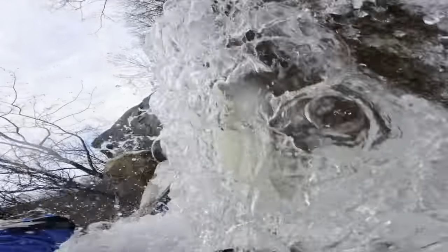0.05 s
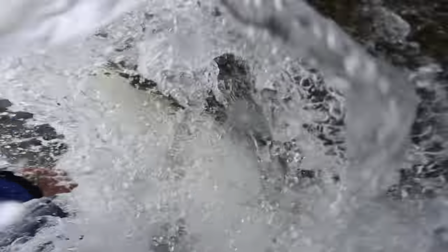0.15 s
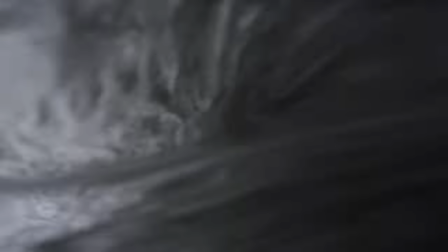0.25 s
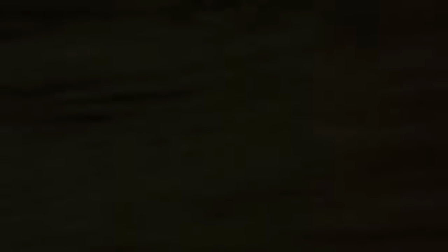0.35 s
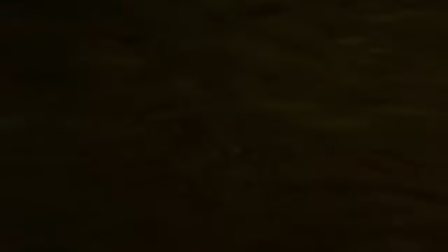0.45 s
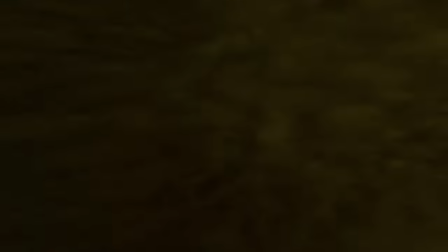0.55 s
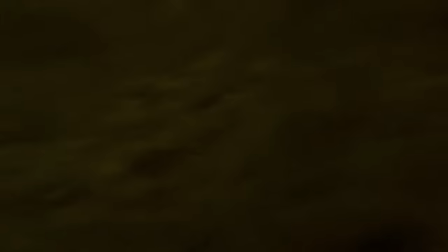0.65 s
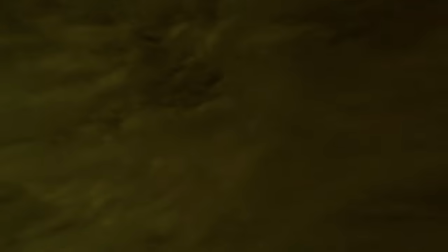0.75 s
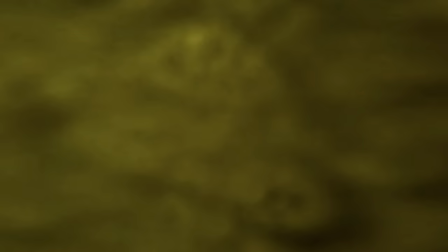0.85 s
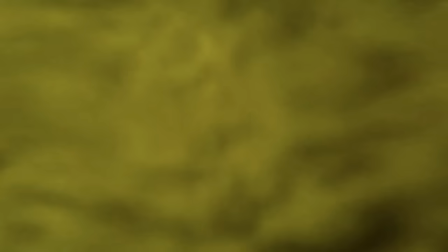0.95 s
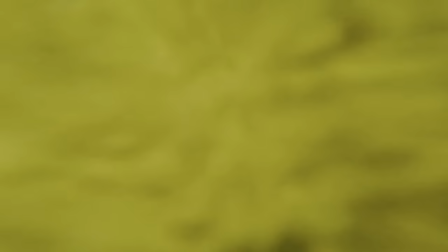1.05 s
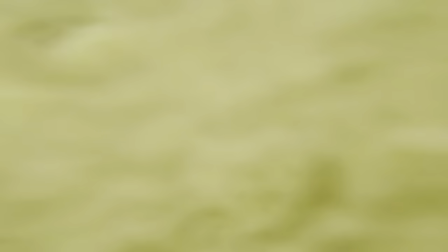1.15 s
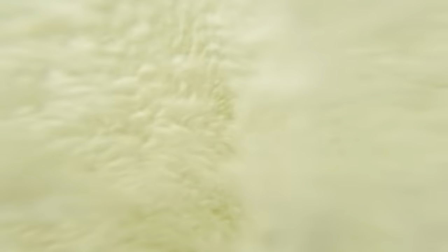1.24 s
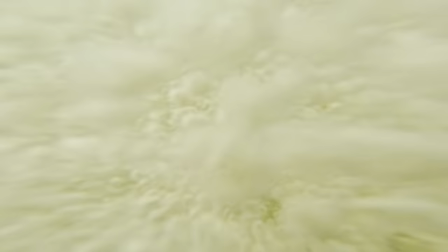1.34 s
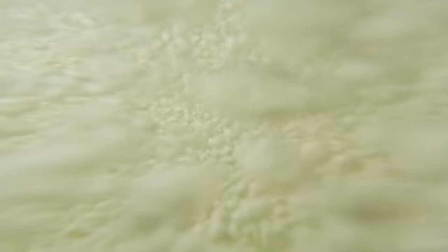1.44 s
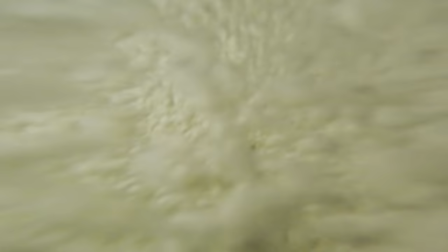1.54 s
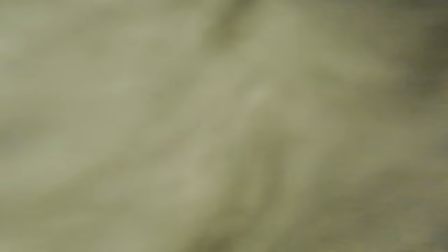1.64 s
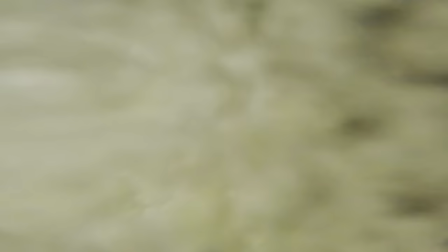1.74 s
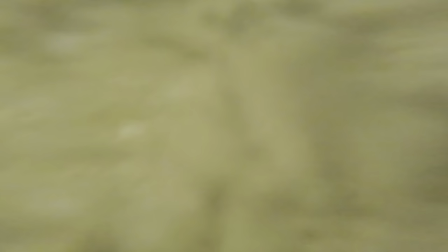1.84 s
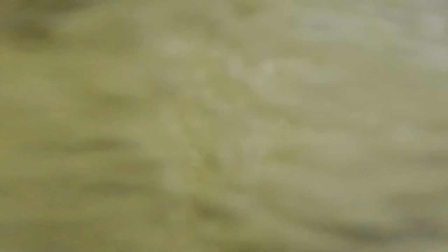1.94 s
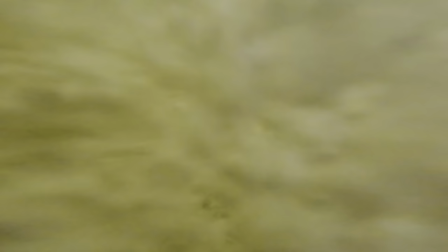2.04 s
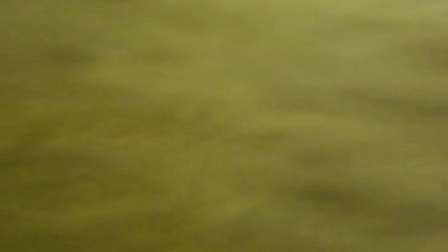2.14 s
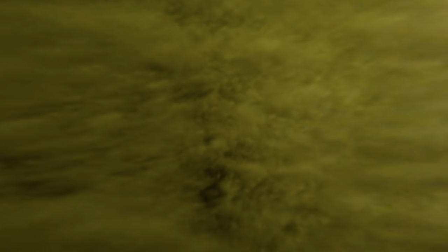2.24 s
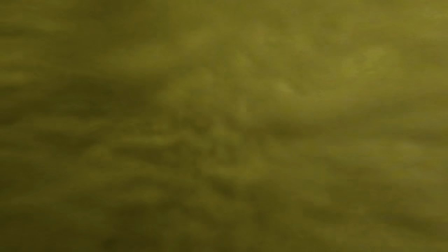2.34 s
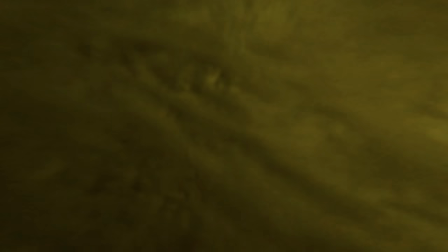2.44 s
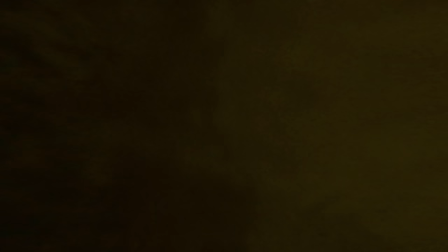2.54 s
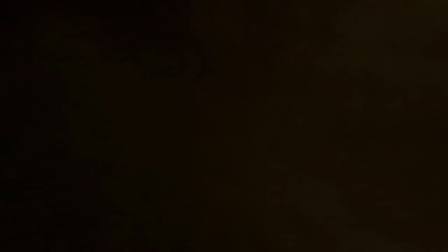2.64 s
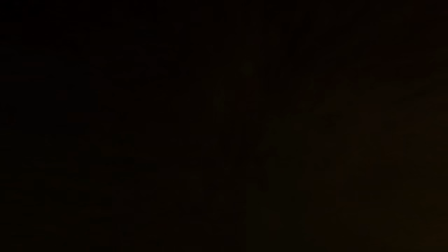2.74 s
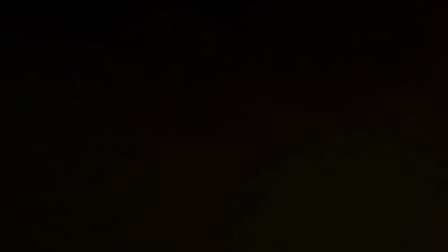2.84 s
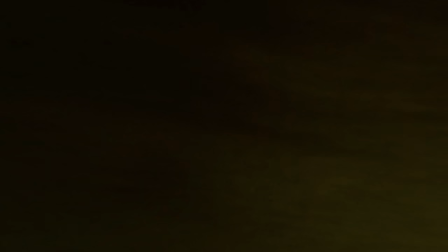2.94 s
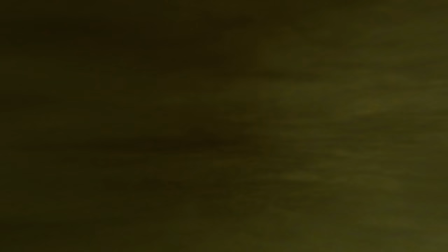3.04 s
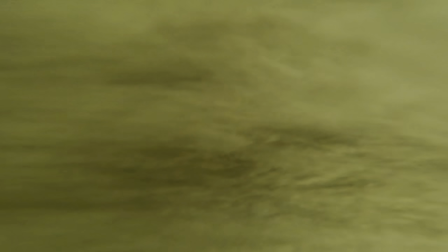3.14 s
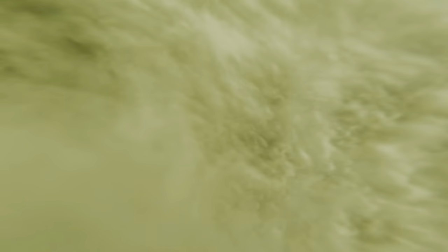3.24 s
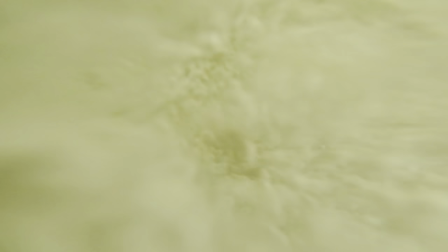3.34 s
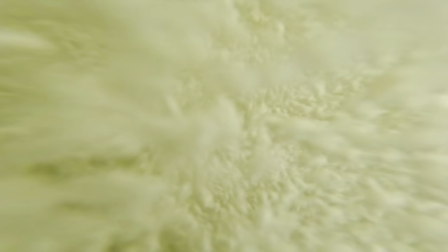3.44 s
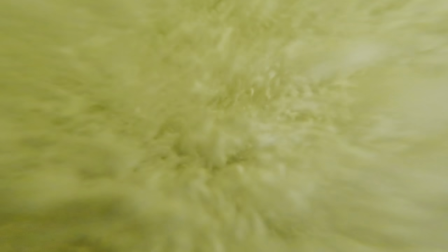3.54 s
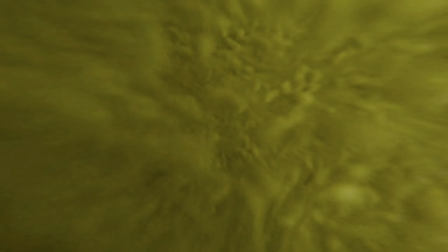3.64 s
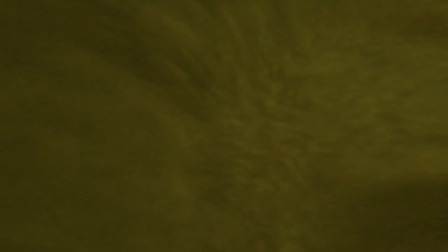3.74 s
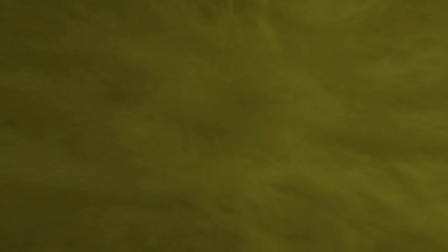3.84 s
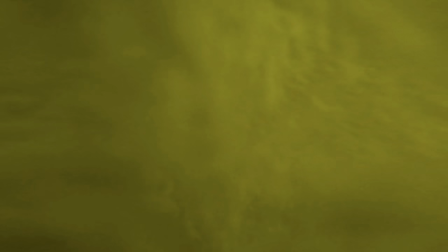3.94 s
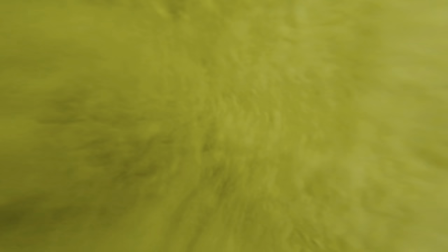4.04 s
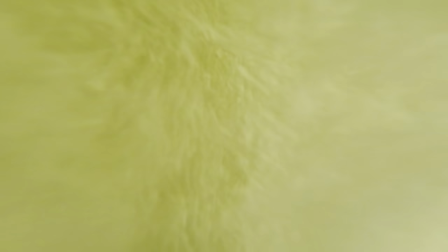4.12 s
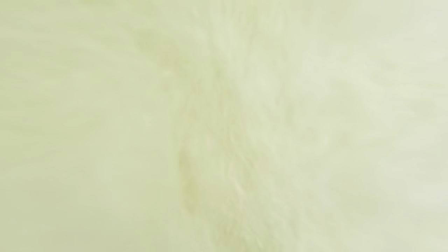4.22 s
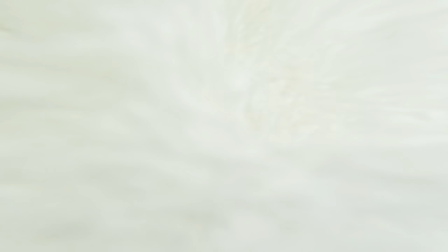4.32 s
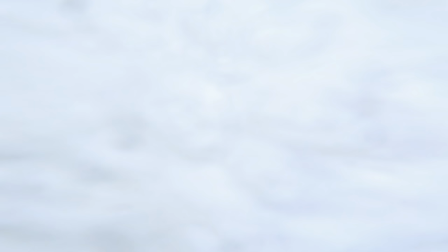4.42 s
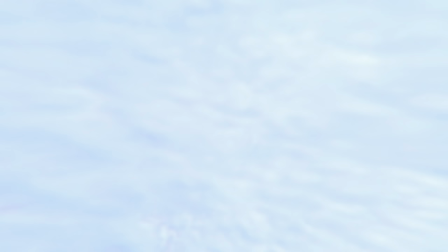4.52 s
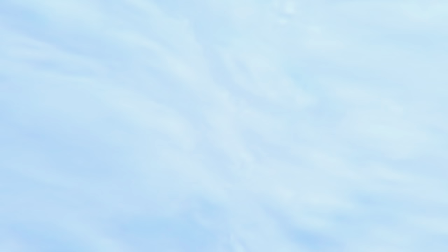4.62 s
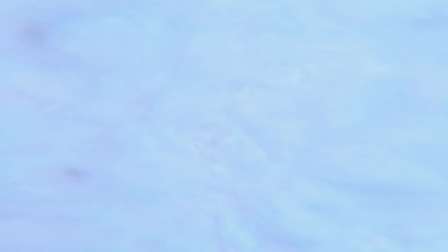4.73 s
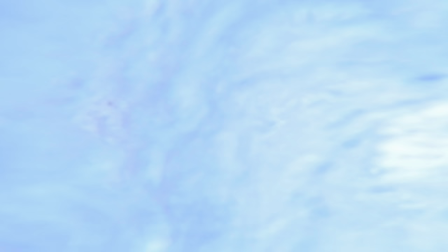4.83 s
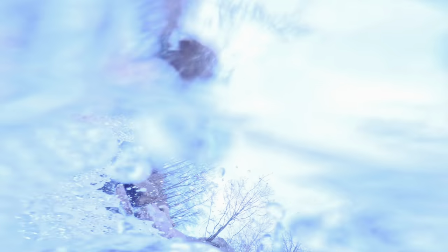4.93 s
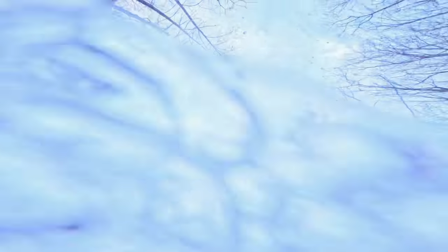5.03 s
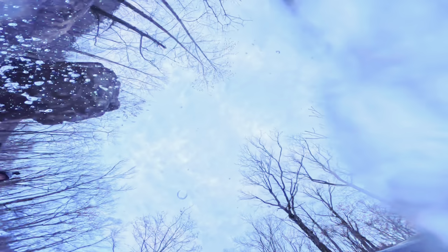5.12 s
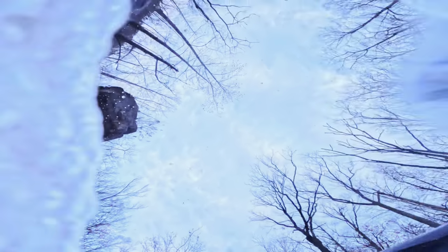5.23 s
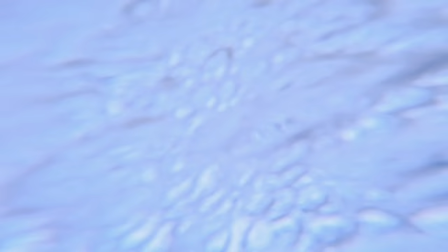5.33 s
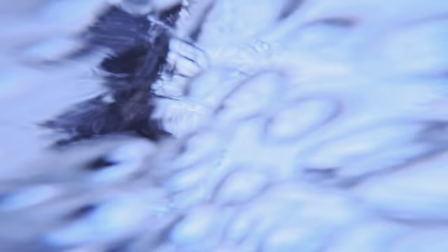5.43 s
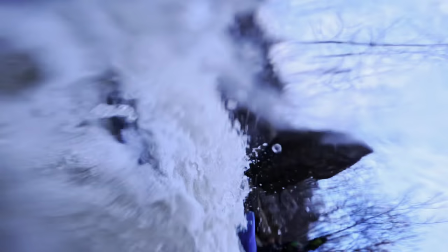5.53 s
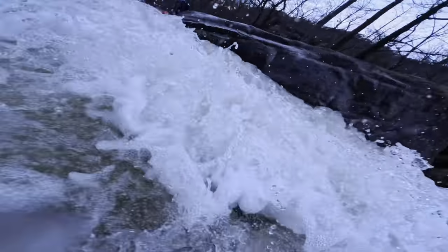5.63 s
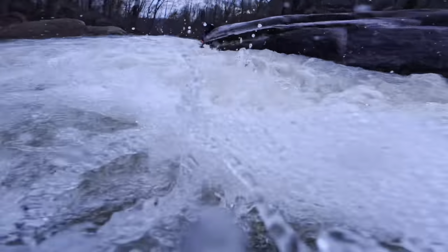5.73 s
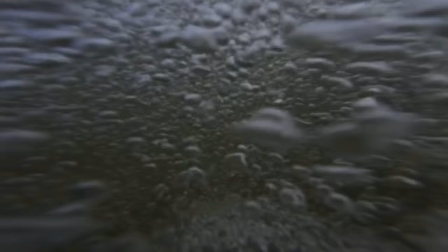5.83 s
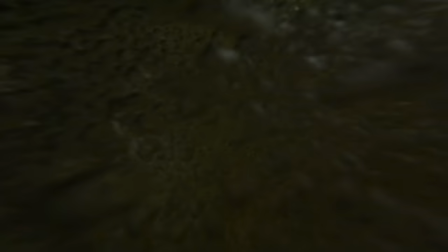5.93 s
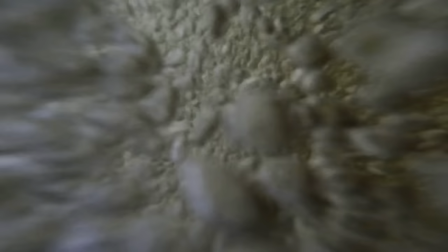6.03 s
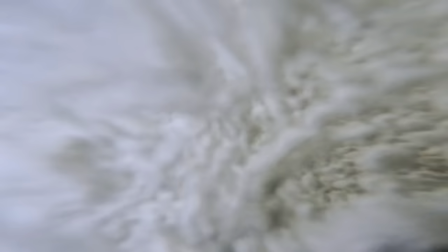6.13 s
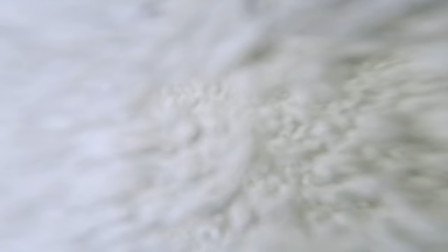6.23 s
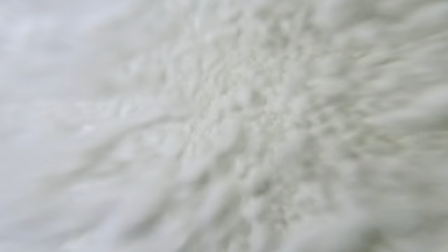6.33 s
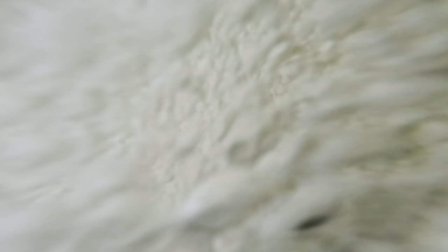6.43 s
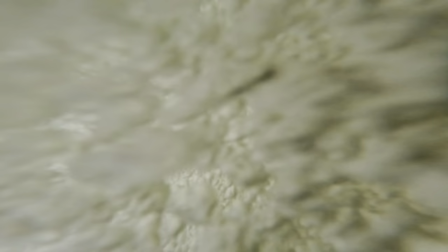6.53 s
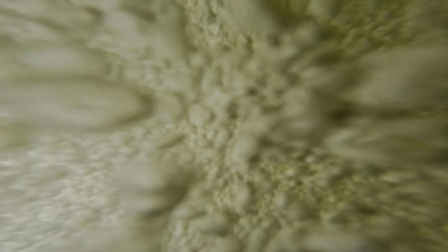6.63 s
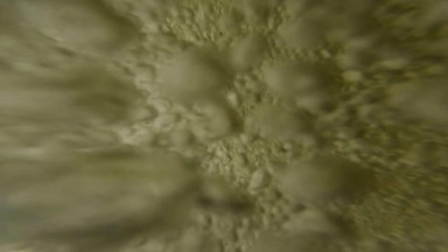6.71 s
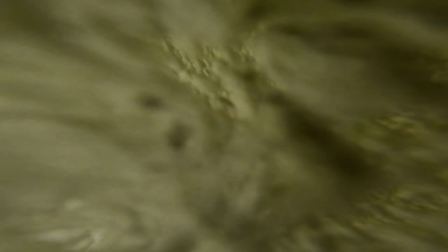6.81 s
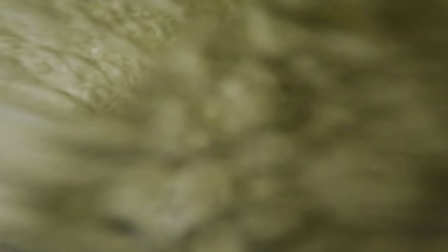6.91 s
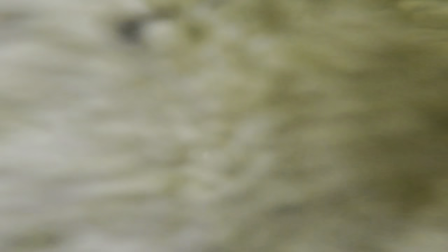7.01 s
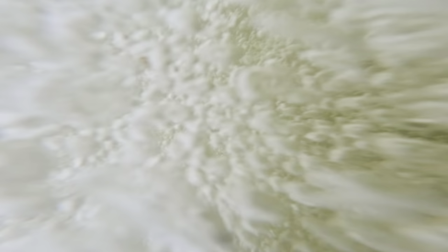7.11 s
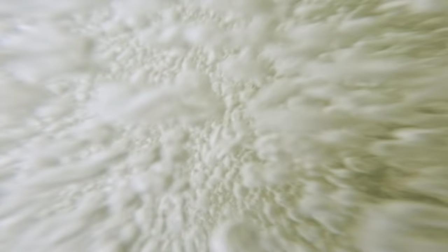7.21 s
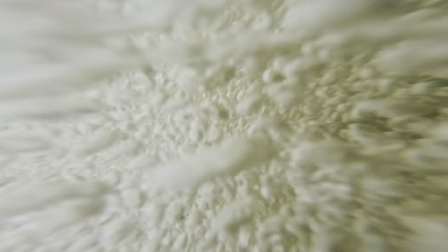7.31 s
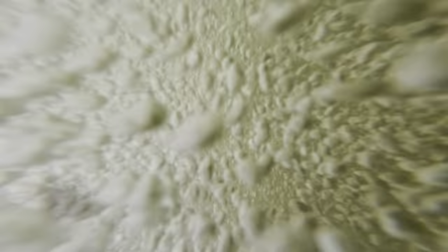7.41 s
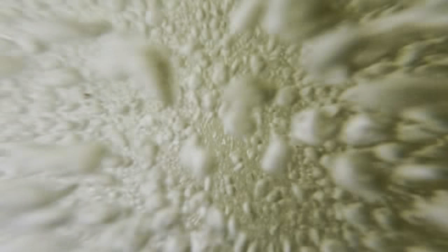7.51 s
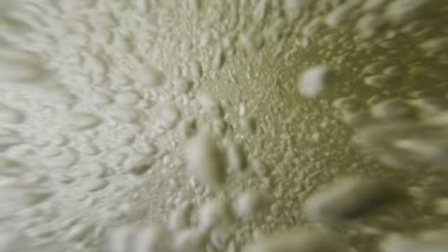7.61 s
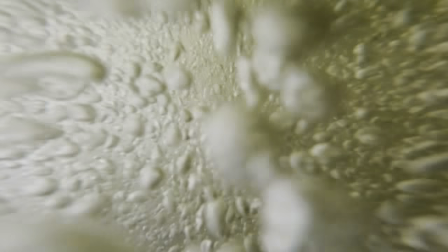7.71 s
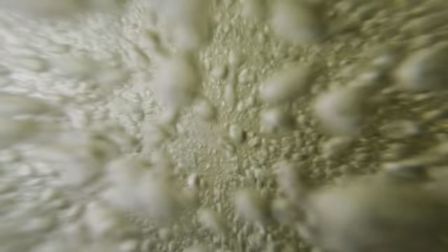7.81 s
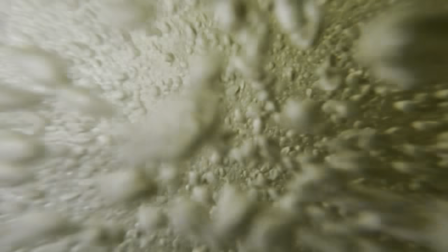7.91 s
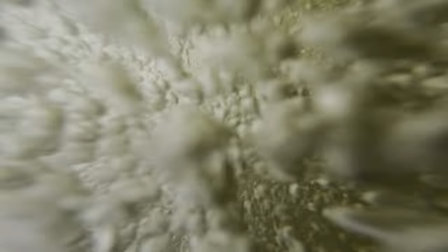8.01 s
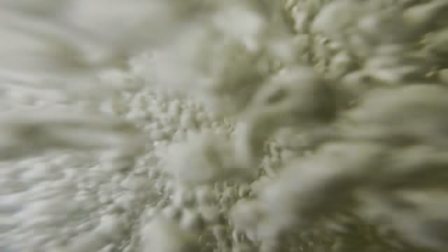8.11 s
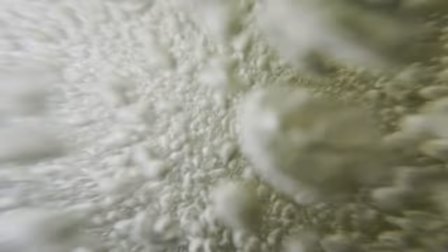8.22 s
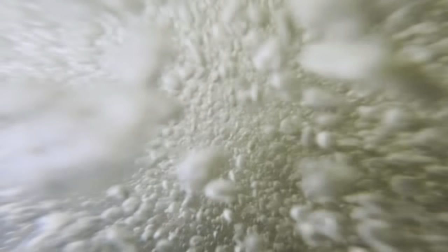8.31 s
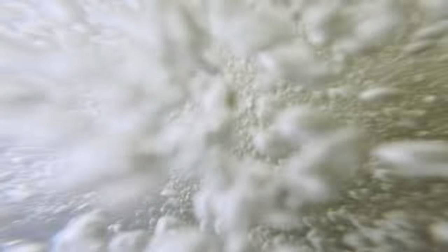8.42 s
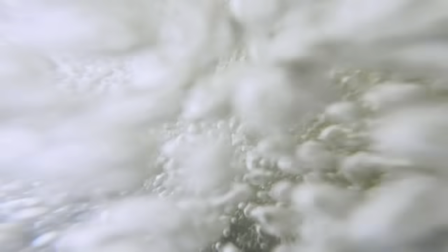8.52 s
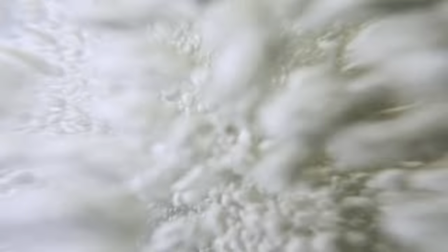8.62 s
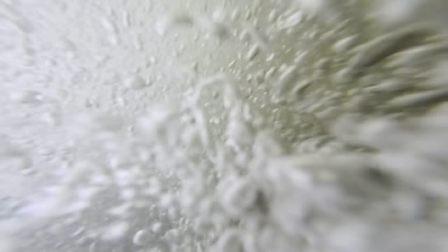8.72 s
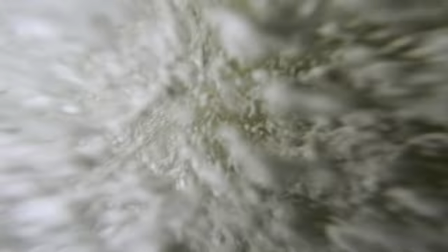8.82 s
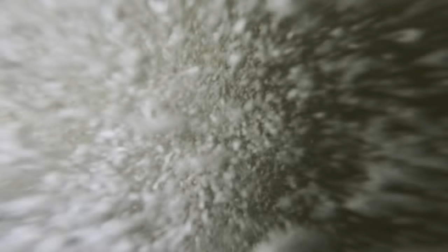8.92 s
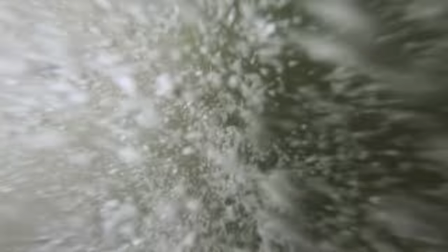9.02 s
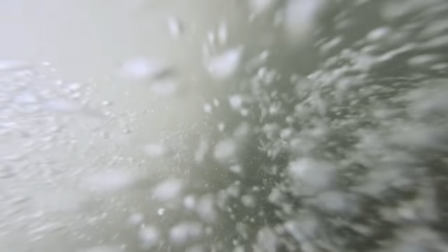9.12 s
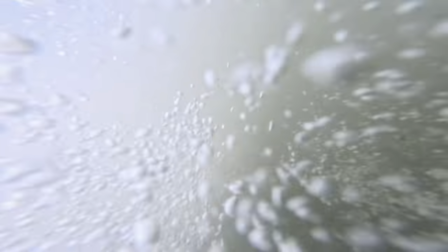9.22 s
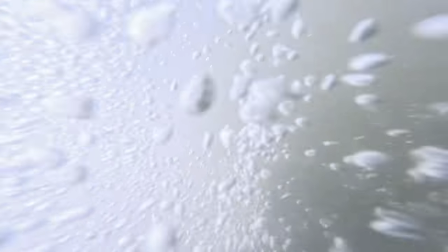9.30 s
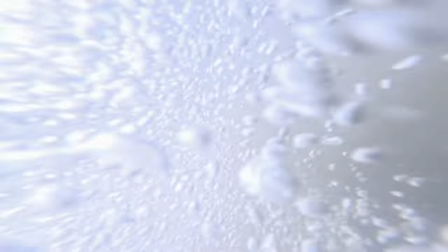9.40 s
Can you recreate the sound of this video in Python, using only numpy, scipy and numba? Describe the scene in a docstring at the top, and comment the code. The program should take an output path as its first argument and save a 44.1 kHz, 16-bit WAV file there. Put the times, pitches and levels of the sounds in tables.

```python
"""Churning whitewater buffets the two flooded microphone ports of a sealed, tumbling camera.
Turbulent pressure drives the air pocket in each port as a resonator whose pitch drifts as it is squeezed.
Bubbles burst against the front port and glug at the rear one, over the rumble of large eddies.
A bright hiss of spray comes before the plunge. The camera blends both ports into stereo."""
import sys
import numpy as np
from scipy import signal
from scipy.fft import rfft, irfft, next_fast_len
from scipy.io import wavfile
from scipy.ndimage import uniform_filter1d, minimum_filter1d
from numba import njit

SR = 44100
rng = np.random.default_rng(int(sys.argv[2]) if len(sys.argv) > 2 else 0)


def bounce(signal):
    """Save signal as a 16-bit WAV file at the path given by the first command-line argument."""
    frames = np.transpose(np.atleast_2d(signal))
    limited = np.clip(frames, -1, 1)
    pcm = np.round(limited * 32767).astype(np.int16)
    wavfile.write(sys.argv[1], SR, pcm)


N = 417075
TIME = np.arange(N) / SR
FFT_SIZE = next_fast_len(N + SR // 4)
FLOOD_S = 0.39   # the front port goes under
WOBBLE = .05   # scale of a resonance's random drift in log frequency


def amp(db):
    """Amplitude ratio of a level in decibels."""
    return 10 ** (np.asarray(db) / 20)

def unit_rms(x):
    """Normalisation to unit mean power."""
    return x / np.sqrt(np.mean(x ** 2) + 1e-20)

def evened(x, span_s):
    """Division by the running rms: the slow level is held at 1 and the fast texture stays."""
    return x / np.sqrt(uniform_filter1d(x ** 2, int(span_s * SR)) + 1e-12)

def in_time(rows):
    """Linear interpolation of each column to one value a sample."""
    times, *columns = np.transpose(rows)
    return [np.interp(TIME, times, c) for c in columns]

def on_bins(rows):
    """Interpolation of each column over log frequency to one value a bin."""
    hz, *columns = np.transpose(rows)
    log_bins = np.log(np.arange(1, FFT_SIZE // 2 + 2) * SR / FFT_SIZE)
    return [np.interp(log_bins, np.log(hz), c) for c in columns]

def colour(x, spectrum):
    """Minimum-phase filtering: folding the cepstrum makes the given spectral shape causal."""
    cepstrum = irfft(np.log(amp(on_bins(spectrum)[0])), FFT_SIZE)
    cepstrum[1:FFT_SIZE // 2] *= 2
    cepstrum[FFT_SIZE // 2 + 1:] = 0
    return irfft(rfft(x, FFT_SIZE) * np.exp(rfft(cepstrum)), FFT_SIZE)[..., :N]

def muffle(x, hz):
    """Low-pass filtering: water in a port takes the treble off."""
    return signal.sosfilt(signal.butter(4, hz, fs=SR, output="sos"), x)

def drift(corner_hz):
    """Random modulation: low-passed noise of unit rms, computed at a tenth of the sample rate."""
    r = np.exp(-20 * np.pi * corner_hz / SR)
    slow = signal.lfilter([1], [1, -2 * r, r * r], rng.standard_normal(N // 10 + 4002))[4000:]
    return np.interp(np.arange(N) / 10, np.arange(len(slow)), unit_rms(slow))

def ping(age, hz, rise_s):
    """Damped oscillation whose envelope swells to 1 at rise_s and dies away."""
    return age / rise_s * np.exp(1 - age / rise_s) * np.sin(2 * np.pi * hz * age)

@njit
def resonator(x, hz, width_hz, passes_bass):
    """Two-pole resonance with a moving centre, in low-pass or band-pass form."""
    y = np.zeros(len(x))
    r = np.exp(-np.pi * width_hz / SR)
    for i in range(2, len(x)):
        pull = 2 * r * np.cos(2 * np.pi * hz[i] / SR)
        feed = (1 - pull + r * r) * x[i] if passes_bass else (1 - r * r) / 2 * (x[i] - x[i - 2])
        y[i] = feed + pull * y[i - 1] - r * r * y[i - 2]
    return y

def buffeting(per_s, spread_db, hiss_db, surge):
    """Turbulent pressure as shot noise: uneven kicks on a hiss, multiplied by the surge gain."""
    sizes = amp(spread_db * np.minimum(rng.exponential(1, N), 3.5)) * rng.choice([-1, 1], N)
    kicks = unit_rms(sizes * (rng.random(N) < per_s / SR))
    return surge * (kicks + amp(hiss_db) * rng.standard_normal(N))


# Pressure spectrum of large eddies: (frequency [Hz], relative level [dB])
EDDY_SPECTRUM = [(12, -36), (22, 1), (100, -3), (250, -7.5), (400, -26.5), (800, -42.5), (2000, -100)]

def rumble(level_db, likeness=.86, pan_db=-1.6):
    """Partial coherence: large eddies push both ports mostly alike."""
    surges = amp([1.92 * drift(18.5), 6.3 * drift(36.0)])
    mid, side = colour(rng.standard_normal((2, N)) * surges, EDDY_SPECTRUM)
    pair = np.sqrt(1 + likeness) * mid + np.sqrt(1 - likeness) * side * [[1], [-1]]
    return amp(level_db) * evened(pair, 0.16) * amp([[pan_db / 2], [-pan_db / 2]])


# Spectrum of droplet impacts: (frequency [Hz], relative level [dB])
SPRAY_SPECTRUM = [(2000, -3), (4000, -11), (7000, -8.5), (9500, -13.5), (12000, -29), (15000, -35.5)]

def spray(stir_db, fade_db_per_s=244):
    """Impact noise: droplets hiss on the open front port until it floods."""
    drive = buffeting(per_s=5800, spread_db=-2, hiss_db=17.5, surge=amp(2.6 * drift(27.0)))
    level_db = -36 + 0.89 * stir_db - fade_db_per_s * np.clip(TIME - FLOOD_S, 0, 1)
    return amp(level_db) * unit_rms(colour(drive, SPRAY_SPECTRUM))

def plinks(per_s, cycles, low_hz, high_hz, spread_db):
    """Free oscillation of small bubbles: each swells and rings briefly at one of ten pitches."""
    births = amp(spread_db * np.minimum(rng.exponential(1, N), 3.5)) * (rng.random(N) < per_s / SR)
    pitch_index, out = rng.integers(0, 10, N), 0
    for k, hz in enumerate(np.geomspace(low_hz, high_hz, num=10)):
        r, w = np.exp(-hz / (cycles * SR)), 2 * np.pi * hz / SR
        stage = [0, np.sin(w), 0, 1, -2 * r * np.cos(w), r * r]
        out = out + signal.sosfilt([stage, stage], births * (pitch_index == k) + 1e-18)
    return unit_rms(out)


# Big bubbles gulping at the rear port: (time [s], level [dB], starting frequency [Hz])
REAR_GULPS = [(4.861, -9.5, 594), (4.925, -7.5, 523), (5.115, -9, 335), (5.304, -11, 870),
              (5.455, -13.5, 580), (7.717, -19.5, 663), (7.804, -10.5, 394), (7.833, -4.5, 375),
              (8.716, -3.5, 714)]

def glugs(chain_s=8.088, gap_s=.0135, chain_db=-8):
    """Damped bubble resonance: gulps ring down as their pitch climbs; six small bubbles leave in a row."""
    out, age = np.zeros(N + 4000), np.arange(4000) / SR
    envelope = np.minimum(age / 0.0016, 1) * np.exp(-age / 0.0086)
    for s, db, hz in REAR_GULPS:
        chirp = np.sin(2 * np.pi * hz * age * (1 + 3 * age))
        out[int(s * SR):][:len(age)] += amp(db) * envelope * chirp
    knock = ping(age, hz=650, rise_s=0.0009)
    for k, uneven_db in enumerate(rng.normal(0, 2, 6)):
        out[int((chain_s + k * gap_s) * SR):][:len(age)] += amp(chain_db + uneven_db) * knock
    return muffle(out[:N], 2500)


# Spectrum of the rasp at a port: (frequency [Hz], relative level [dB])
RASP_SPECTRUM = [(900, -4), (2000, -1), (3000, 4), (4250, -4), (4800, -12), (7500, -26), (10000, -48.5),
                 (12000, -60.5)]

def rasp(drive):
    """Spectral shaping: broadband pressure becomes a rasp that peaks near 3 kHz."""
    return colour(drive, RASP_SPECTRUM)

def air_pocket(drive, hz, width_hz, skirt_db, low_hz, skirt_width_hz, top_hz):
    """Forced resonance of trapped air: a wobbling peak with a broad skirt below it and little above."""
    drive = muffle(drive, top_hz)
    centre_hz = hz * np.exp(WOBBLE * (drift(22.0) + 1.33 * drift(6.5)))
    skirt = signal.sosfilt(signal.butter(2, low_hz, "high", fs=SR, output="sos"), drive)
    for _ in range(2):
        skirt = resonator(skirt, hz, skirt_width_hz, passes_bass=True)
    ringing = resonator(drive, centre_hz, width_hz, passes_bass=False)
    ringing = resonator(ringing, centre_hz, 1.2 * width_hz, passes_bass=True)
    return evened(unit_rms(ringing) + amp(skirt_db) * unit_rms(skirt), 0.28)

def rear_port(rear_hz, rear_db):
    """Forced resonance of the larger, lower pocket, with small bubbles and a faint fizz on top."""
    surge = amp(1.1 * drift(7.7) + 0.92 * drift(98.0))
    drive = buffeting(per_s=200, spread_db=3, hiss_db=-1.5, surge=surge)
    ringing = air_pocket(drive, rear_hz, width_hz=145., skirt_db=3,
                         low_hz=127, skirt_width_hz=930., top_hz=2500)
    bubbles = plinks(per_s=27, cycles=3.5, low_hz=299.2, high_hz=1110, spread_db=2)
    fizz = unit_rms(muffle(rasp(drive * amp(9.5 * drift(10.0))), 6200))
    return amp(rear_db) * (ringing + amp(-12) * bubbles + amp(-28.5) * fizz)


# Big bubbles bursting on the front port:
# (time [s], plink level [dB], plink frequency [Hz], relative pocket ring level [dB])
BURSTS = [(0.5427, -19.5, 2420, -17.5), (0.9447, -17, 2900, -17), (1.077, -17, 2400, -22.5),
          (1.697, -19.5, 2660, -15.5), (1.861, -16.5, 2280, -22.5), (2.405, -11.5, 2920, -17.5),
          (2.5035, -18, 2780, -20.5), (3.3962, -13.5, 2590, -19.5), (3.439, -13.5, 2890, -29.5),
          (3.486, -12.5, 2470, -19), (3.5447, -17.5, 3020, -21), (3.5675, -12, 2140, -14),
          (3.691, -16.5, 3500, -17.5), (3.714, -11.5, 3330, -30.5), (3.7357, -15, 3380, -12),
          (3.896, -16, 2920, -10), (3.9097, -17.5, 2880, -23), (3.98, -16.5, 2255, -10),
          (4.003, -12, 3000, -17.5), (4.192, -16.5, 2550, -9), (4.7197, -29.5, 2870, -26),
          (4.814, -19, 2430, -8), (5.0319, -30.5, 2610, -24.5), (5.1095, -33, 2380, -17),
          (5.1507, -29, 2330, -13.5), (5.295, -39, 2350, -11), (5.5304, -24.5, 3000, -4.5),
          (5.8694, -30.5, 3050, -12), (5.9229, -19.5, 2100, -7), (5.937, -20, 2310, -8),
          (6.3479, -27, 2430, -11), (6.3912, -31.5, 3190, -11), (6.4504, -31, 3740, -5),
          (6.4875, -32.5, 2980, -10), (6.5326, -21.5, 2630, -12.5), (6.629, -29.5, 4320, -5.5),
          (6.6555, -30, 3280, -9.5), (6.735, -17.5, 2500, -22.5), (6.7794, -27, 2800, -16.5),
          (6.8014, -14.5, 2620, -11.5), (6.8644, -18, 2670, -10.5), (6.8806, -18, 2740, -8),
          (6.904, -13.5, 2770, -21), (7.638, -26, 3320, -30), (7.6857, -21, 2700, -7.5),
          (7.8028, -23, 2590, -13.5), (7.896, -14, 2740, -17.5), (7.9134, -23.5, 2780, -11),
          (7.9366, -28.5, 4270, -14), (7.9675, -13.5, 2910, -10.5), (8.112, -26, 2525, -25.5),
          (8.276, -39.5, 2700, -7.5), (8.343, -42, 2630, -13.5), (8.3802, -26, 3500, -23),
          (8.812, -14.5, 2380, -19.5), (9.031, -27, 3760, -25), (9.322, -26.5, 2100, -17.5),
          (9.3945, -32, 2500, -14.5)]

def bursts(front_hz, top_mode_hz=4015, crack_decay_s=0.003):
    """Impulse excitation: each burst cracks, plinks, and rings the pocket and the port's highest mode."""
    tones, age = np.zeros(N + 2000), np.arange(2000) / SR
    impulses = np.zeros(N)
    for s, plink_db, plink_hz, ring_db in BURSTS:
        at = int(s * SR)
        plink = amp(plink_db) * ping(age, plink_hz, rise_s=0.0012)
        top_mode = amp(plink_db - 16) * ping(age, top_mode_hz, rise_s=0.00076)
        ring = amp(ring_db - 3.5) * ping(age, front_hz[at], rise_s=0.0017)
        tones[at:at + len(age)] += plink + top_mode + ring
        impulses[at] = amp(plink_db)
    envelope = signal.lfilter([1], [1, -np.exp(-1 / (crack_decay_s * SR))], impulses + 1e-18)
    cracks = rasp(envelope * rng.standard_normal(N))
    return muffle(tones[:N], 8900) + amp(1.5) * muffle(cracks, 5300)

def front_rasp(drive, upper_hz, stir_db):
    """Masking: the upper mode rings clean in calm flow; strong flow covers it with noise and bubbles."""
    noise = rasp(drive * amp(1.3 * drift(37.0)))
    mode_hz = upper_hz * np.exp(WOBBLE * drift(12.0))
    mode = resonator(noise, mode_hz, 220., passes_bass=False)
    mode = resonator(mode, mode_hz, 430., passes_bass=False)
    bubble_rate = 130 * amp(0.49 * drift(2.3))
    bubbles = plinks(bubble_rate, cycles=2.4, low_hz=2100, high_hz=3500, spread_db=11.5)
    bubbles = amp(-2.5 + 0.37 * stir_db) * muffle(bubbles, 11000)
    mode = amp(-1 - 0.15 * stir_db + 4.1 * drift(8.3)) * unit_rms(evened(mode, 0.64))
    mix = evened(amp(0.42 * stir_db) * unit_rms(noise) + mode + bubbles, .15)
    treble = signal.sosfilt(signal.butter(4, 4300, "high", fs=SR, output="sos"), mix)
    treble_gain = amp(0.21 * stir_db + 3.3 * drift(5.2))
    return mix + treble * (treble_gain - 1)


# Unevenness of the flow striking the front port: (time [s], surge depth [factor])
GUSTINESS = [(1.0, .5), (1.1, 1.3), (3.2, .6), (3.45, 0.95), (4.1, 1.1), (4.2, .5), (4.55, 1.18)]

def front_port(front_hz, upper_hz, stir_db):
    """Turbulent excitation: one gusty pressure drives the pocket and the rasp; bubbles burst on top."""
    surge = amp(in_time(GUSTINESS)[0] * (2.9 * drift(20.2) + 2.72 * drift(99.0)))
    drive = buffeting(per_s=500 * amp(.3 * stir_db), spread_db=2,
                      hiss_db=-4.5 + 0.16 * np.abs(stir_db), surge=surge)
    rasping = front_rasp(drive, upper_hz, stir_db)
    ringing = air_pocket(drive, front_hz, width_hz=224., skirt_db=0.5 + 0.28 * stir_db,
                         low_hz=910, skirt_width_hz=980., top_hz=2020)
    fill_s = 0.051   # the pocket rings weakly until the port has filled
    unfilled_db = -14.5 * np.clip((FLOOD_S + fill_s - TIME) / fill_s, 0, 1)
    size_db = -10.5 * np.log2(front_hz / 1442)   # a larger pocket rings lower and louder
    pocket_db = -27.5 + 0.49 * stir_db + unfilled_db + size_db
    return amp(pocket_db) * ringing + amp(-41 + stir_db) * rasping + bursts(front_hz)


# Strength of the flow past the front port: (time [s], relative level [dB])
FRONT_STIR = [(0, 5), (.95, 12), (1.6, 9), (3.1, 9.5), (3.55, 20.5), (3.75, 14.5), (3.84, 8.5),
              (3.94, -4.5), (4.01, 12.5), (4.1, 9.5), (4.16, 18), (4.3, 18), (4.66, 1), (4.98, 8.5),
              (5.06, -14.5), (5.33, 9), (5.61, -8.5), (5.67, -15), (5.9, -18), (5.94, 2), (6.1, 7.5),
              (6.4, -2), (6.79, 1.5), (6.9, 10.5), (7.29, 5.5), (7.43, 14.5), (7.74, -3.5), (7.9, 3),
              (8.19, -15), (8.4, 0.5), (8.64, -12.5), (8.85, 17.5), (9.17, 3), (9.22, -9.5), (9.46, -10.5)]
# Strength of the sound at the rear port: (time [s], level [dB])
REAR_LEVEL = [(0, -18.5), (.36, -14.5), (.55, -13.5), (.72, -19), (3.13, -16), (3.4, -19), (5.0, -21.5),
              (5.11, -10.5), (5.32, -25.5), (5.61, -9), (5.75, -37), (5.87, -12.5), (6.0, -17), (6.77, -22),
              (7.01, -16.5), (7.85, -24), (8.48, -18), (9.46, -23)]
# Lulls in the flow: (deepest time [s], ebb duration [s], front change [dB], rear change [dB])
FLOW_LULLS = [(0.206, 0.034, -13.5, -8.5), (0.471, 0.057, -17.5, 2), (1.495, 0.49, -9.5, 0.5),
              (1.659, 0.14, -13.5, 1.4), (1.972, .26, -13.5, 3), (2.394, .02, -6, -1), (3.468, .4, -16, -4),
              (3.647, 0.23, -14, -5), (5.058, .06, -1, -26.5), (5.22, 0.15, -17, -21.5),
              (5.56, 0.088, 3.5, -19), (5.686, 0.069, -7.5, -37.5), (5.9, 0.018, -8.5, -20.5),
              (6.838, 0.056, -18.5, 0.5)]

def flow_levels(refill_s=0.07):
    """Amplitude modulation by the flow: front and rear levels in dB, with lulls that ebb and refill."""
    lulls_db = sum(np.outer(change_db, np.interp(TIME, [s - ebb_s, s, s + refill_s], [0, 1, 0]))
                   for s, ebb_s, *change_db in FLOW_LULLS)
    return np.array(in_time(FRONT_STIR) + in_time(REAR_LEVEL)) + lulls_db

def crossfeed(x, gain_db, lead_rad):
    """Transfer function from a port to the far channel: gain and phase lead by frequency."""
    return irfft(rfft(x, FFT_SIZE) * amp(gain_db) * np.exp(1j * lead_rad), FFT_SIZE)[:N]


# Resonances of the squeezed air: (time [s], rear pocket [Hz], front pocket [Hz], front upper mode [Hz])
POCKET_PITCHES = [(0, 515, 1213, 3500), (.83, 559, 1350, 2410), (1.0, 625, 1825, 2750),
                  (1.06, 768, 1208, 2485), (1.16, 538, 1810, 2750), (1.45, 545, 1470, 2690),
                  (2.3, 555, 1686, 2620), (3.3, 765, 1800, 3010), (3.85, 930, 1825, 3300),
                  (4.15, 813, 1974, 3390), (4.45, 618, 1310, 2520), (5.2, 541, 1240, 2330),
                  (5.55, 550, 1320, 3000), (5.78, 529, 894, 3670), (5.95, 538, 1152, 2530),
                  (6.5, 578, 1244, 2400), (7.05, 579, 1700, 2760), (7.5, 680, 1308, 2380),
                  (7.9, 720, 1810, 2850), (8.5, 692, 1573, 2830), (8.95, 594, 1403, 2500)]
# Rear port's share in the left channel: (frequency [Hz], gain [dB], phase lead [rad])
REAR_TO_LEFT = [(404, -14, 0.2), (610, -10, 1.43), (880, -16.5, 1.76), (3000, -18, 0.32)]
# Front port's share in the right channel: (frequency [Hz], gain [dB])
FRONT_TO_RIGHT = [(300, 14), (1300, -0.5), (2400, -3.5), (3800, -7.5), (4600, -34), (9000, -58)]

def scene():
    """Superposition: both ports blend into left and right over a rumble that follows the rear level."""
    stir_db, rear_db = flow_levels()
    rear_hz, front_hz, upper_hz = in_time(POCKET_PITCHES)
    front = front_port(front_hz, upper_hz, stir_db) + spray(stir_db)
    rear = rear_port(rear_hz, rear_db) + glugs()
    left = front + crossfeed(rear, *on_bins(REAR_TO_LEFT))
    right = rear + crossfeed(front, *on_bins(FRONT_TO_RIGHT), lead_rad=np.pi / 2)
    return np.array([left, right]) + rumble(level_db=-19 + 0.34 * (rear_db + 16.5))

def record(dry, ceiling=.92, cutoff_hz=15000):
    """Peak limiting: the gain ducks smoothly around peaks over the ceiling; a low-pass cuts the top."""
    gain = minimum_filter1d(ceiling / np.maximum(np.abs(dry).max(axis=0), ceiling), size=441)
    gain = uniform_filter1d(uniform_filter1d(gain, size=220), size=220)
    return signal.sosfilt(signal.cheby2(12, 70, cutoff_hz, fs=SR, output="sos"), dry * gain)


dry = scene()
out = record(dry)
bounce(out)
```